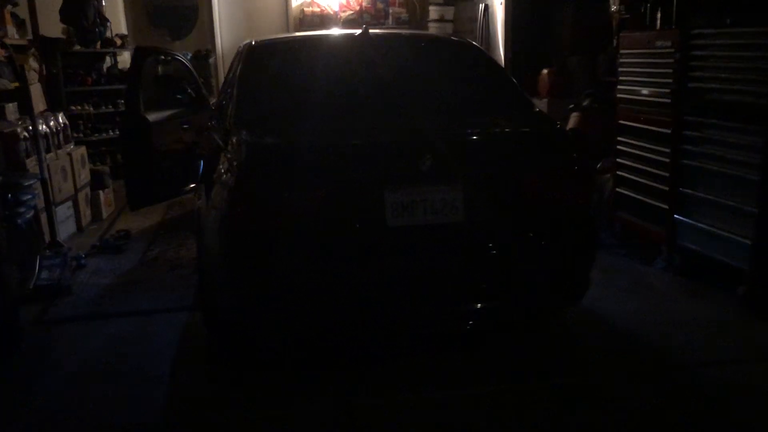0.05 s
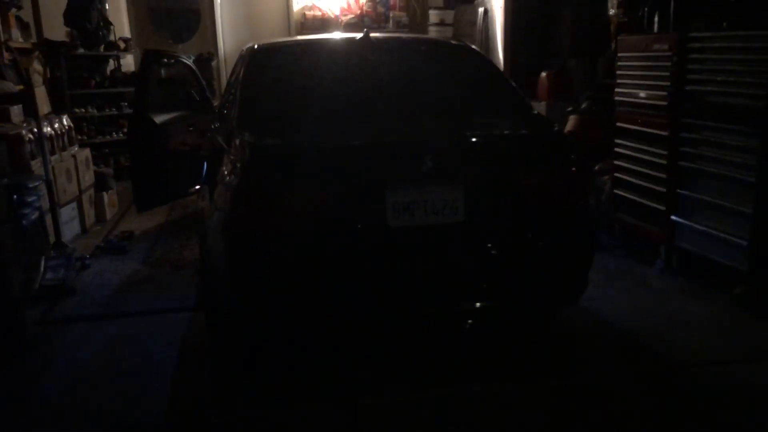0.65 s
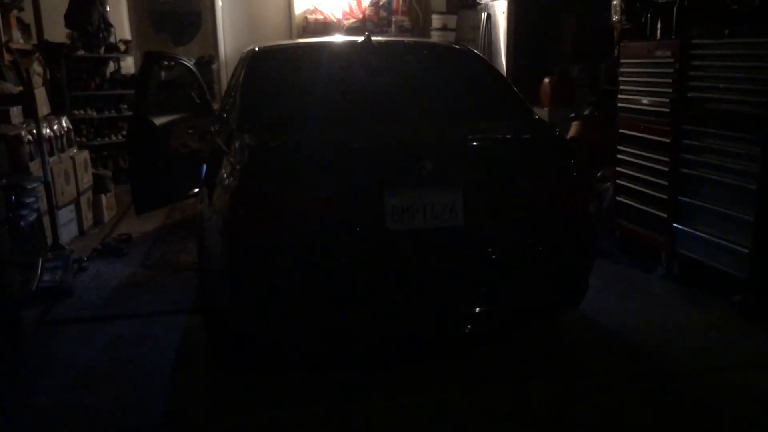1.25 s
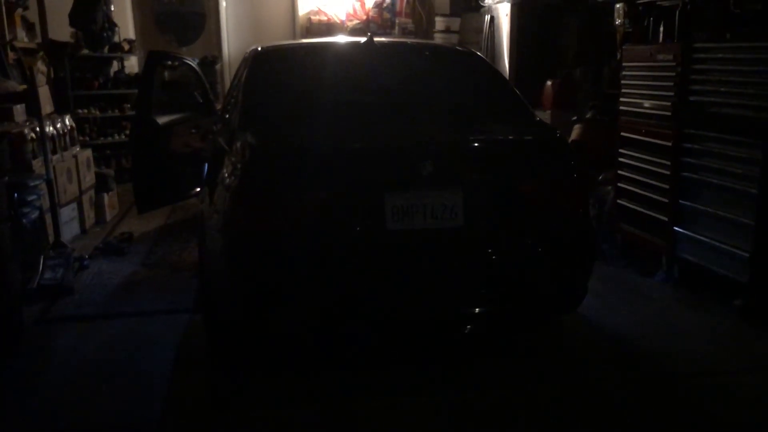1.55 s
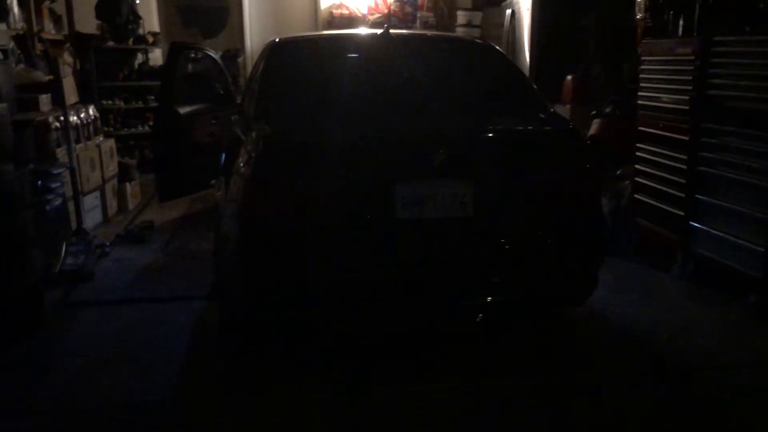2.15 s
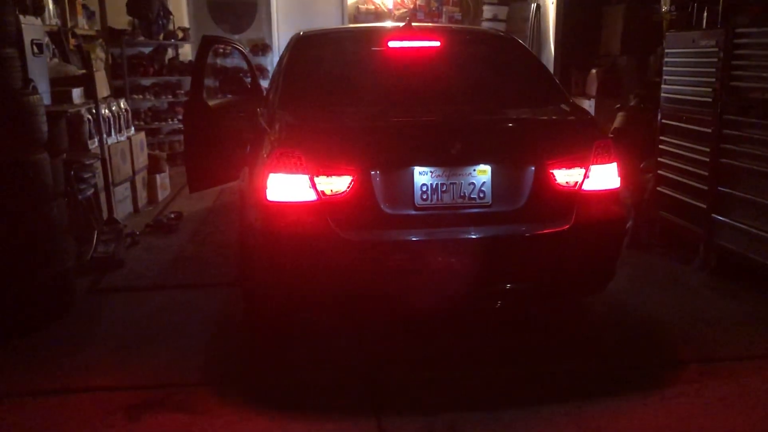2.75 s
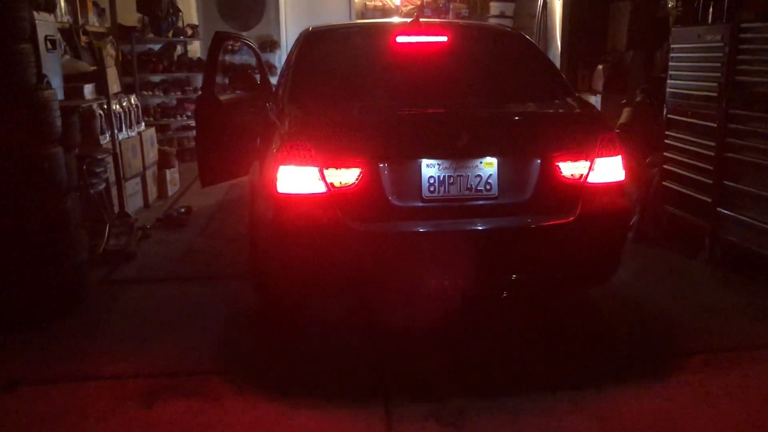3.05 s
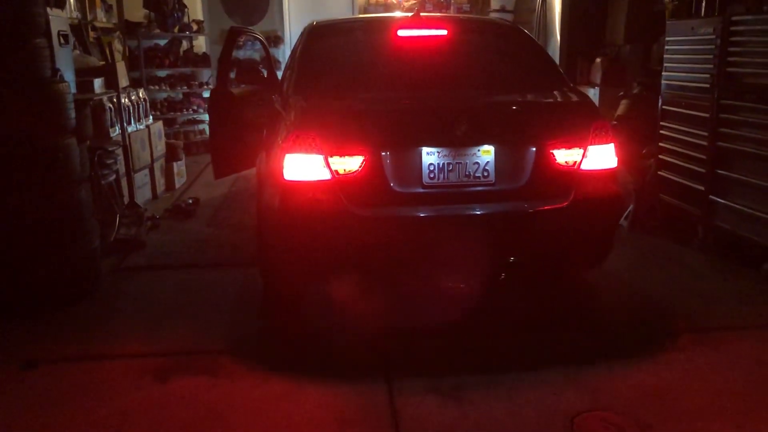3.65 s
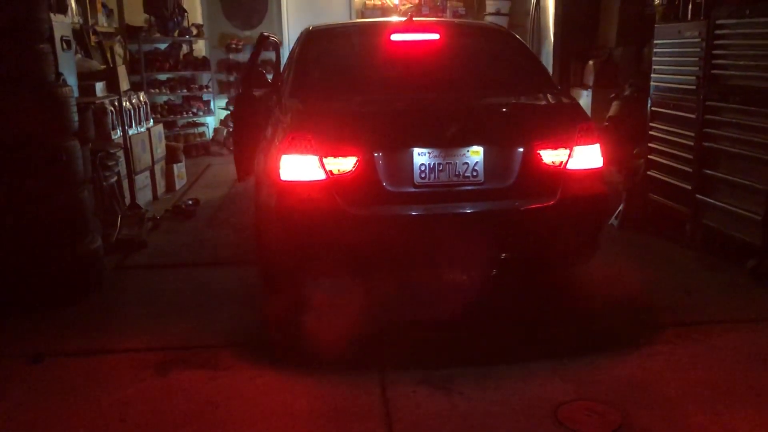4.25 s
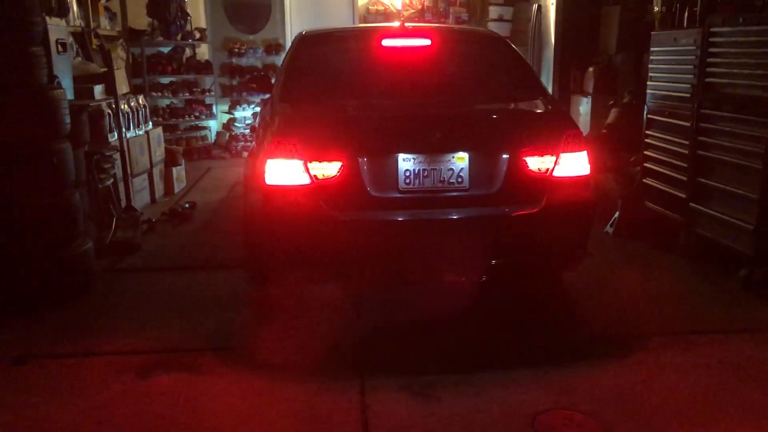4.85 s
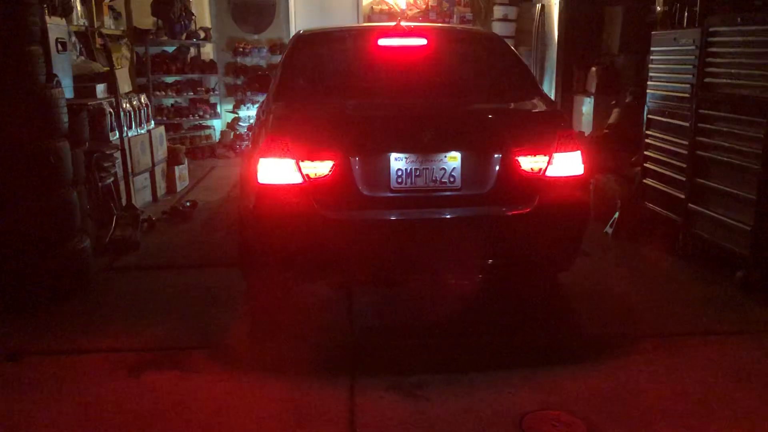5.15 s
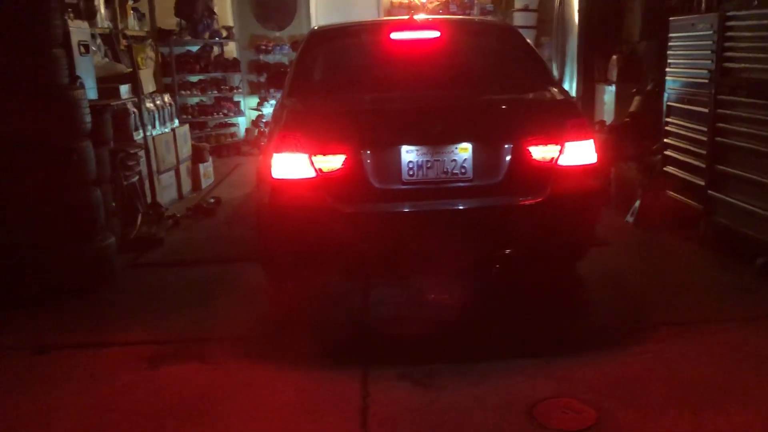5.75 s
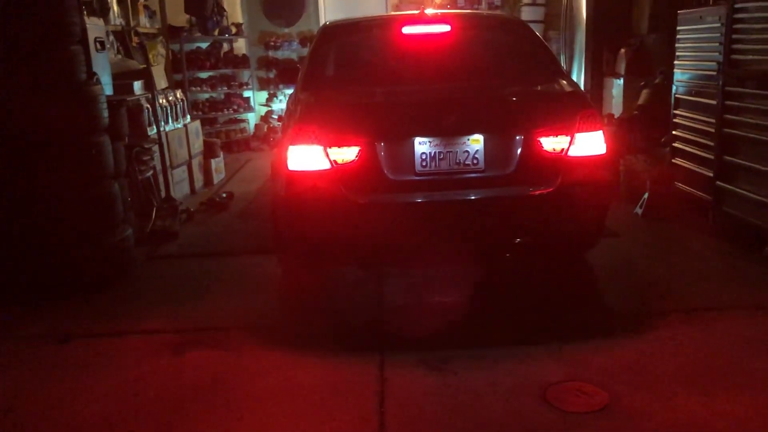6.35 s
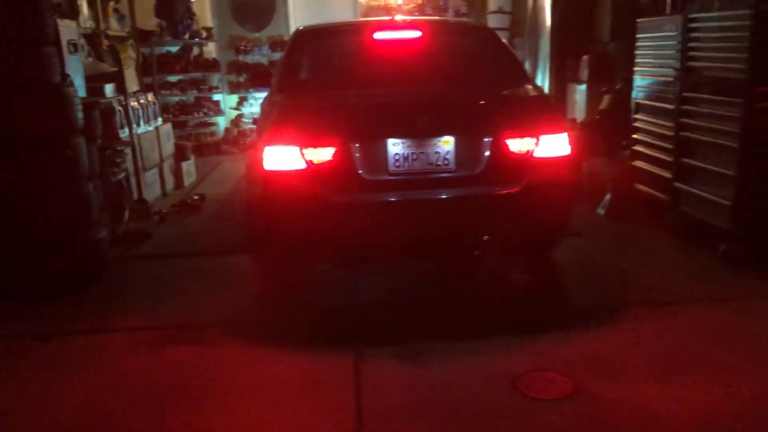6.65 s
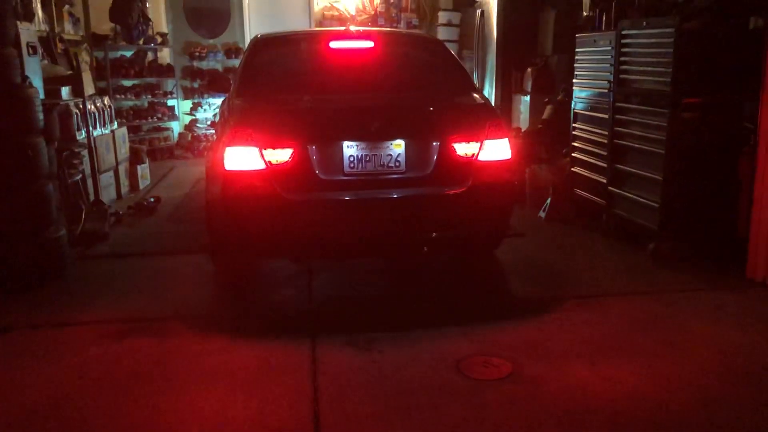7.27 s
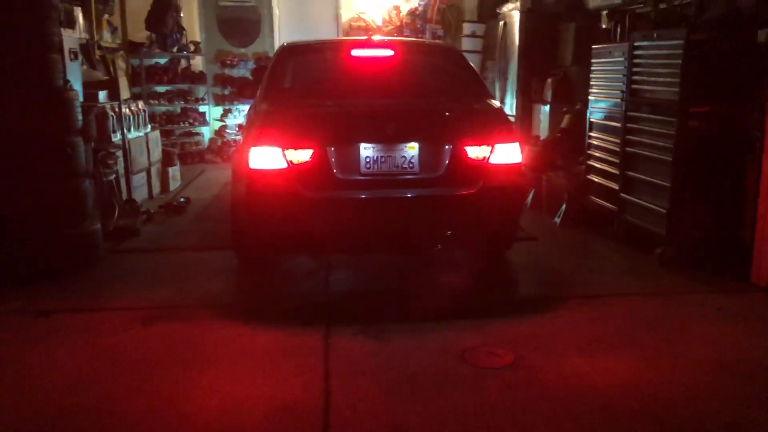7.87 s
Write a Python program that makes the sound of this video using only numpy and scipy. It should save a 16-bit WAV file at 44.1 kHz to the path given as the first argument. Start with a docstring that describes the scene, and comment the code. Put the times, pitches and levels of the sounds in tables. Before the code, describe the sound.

Heard from behind the exhaust, a car starts cold in a garage with a short echo. Two faint motor whirs and a soft jingle of keys come first, over a low room murmur. A brief grinding crank ends in a double bang and a surge of revs. The engine then drops to a loud, throbbing, raspy idle that keeps going, with a barely heard door latch and scattered exhaust pops.

```python
"""A six-cylinder car starts cold in a garage, the microphone behind its tailpipes.
From the cabin a small lock motor whirs and keys jingle; the starter clashes in and cranks, and the
engine catches with two bangs of unburnt fuel and flares up. It sinks to a loud fast idle with a late
spark: the two banks throb unevenly and every firing rasps in the warming pipes. A door shuts.
The cluttered walls add a short tail to the whirs, keys, bangs, rasp and door."""
import sys
import numpy as np
from scipy import signal
from scipy.fft import rfft, irfft
from scipy.io import wavfile
from scipy.ndimage import uniform_filter1d

SR = 44100
rng = np.random.default_rng(int(sys.argv[2]) if len(sys.argv) > 2 else 0)


def to_wav(sig):
    """Store sig (one row per channel, or 1-D mono) as 16-bit WAV at the path in sys.argv[1].

    Samples outside -1..1 are clipped; the rate is SR.
    """
    pcm = np.clip(np.atleast_2d(sig), -1, 1) * 32767
    pcm = np.round(pcm).astype(np.int16)
    wavfile.write(sys.argv[1], SR, pcm.T)  # frames by channels


N = 353241
TIME = np.arange(N) / SR
CUTOFF_HZ = 15850

# spectrum of clattering metal, for starter teeth and door latch: frequency_hz, level_db
CLATTER = [(1470, -11), (2500, -3), (3460, -4.5), (4420, -5), (5620, -8.5), (6070, -9.5), (6760, -11),
           (9500, -18), (15800, -28.5)]
# the six cylinders in firing order, every third one weak: level_db
CYLINDER_DB = [1.8, -2, 1.3, 2.3, -2, -0.4]


def from_db(db):
    """Decibels to gain."""
    return 10 ** (np.asarray(db) / 20)


def rms_one(x):
    """Scale to rms 1."""
    return x / np.sqrt(np.mean(x ** 2) + 1e-20)


def curve(rows):
    """Join (time_s, value) rows with straight lines."""
    return np.interp(TIME, *np.transpose(rows))


def ramp(start_s, length_s):
    """Rise from 0 to 1."""
    return np.clip((TIME - start_s) / max(length_s, 1e-3), 0, 1)


def envelope(start_s, attack_s, hold_s, fall_db_per_s):
    """Attack, hold, release."""
    falling_s = np.clip(TIME - start_s - attack_s - hold_s, 0, 2)
    return ramp(start_s, attack_s) * from_db(-fall_db_per_s * falling_s)


def gain_at(spectrum, hz):
    """Read a spectrum; it falls steeply beyond its ends."""
    points_hz, db = np.transpose(spectrum)
    hz = np.maximum(hz, 1)
    skirts = np.minimum(1, np.minimum(hz / points_hz[0], points_hz[-1] / hz)) ** 4
    return from_db(np.interp(np.log(hz), np.log(points_hz), db)) * skirts


def causal(gain):
    """The response with these gains that rings only after its cause."""
    cepstrum = irfft(np.log(gain + 1e-6))
    half = cepstrum.shape[-1] // 2
    cepstrum[..., 1:half] *= 2
    cepstrum[..., half + 1:] = 0
    return np.exp(rfft(cepstrum))


def noise(spectrum):
    """Coloured noise, rms 1."""
    response = irfft(causal(gain_at(spectrum, np.fft.rfftfreq(8192, 1 / SR))))
    return rms_one(signal.oaconvolve(rng.standard_normal(N), response)[:N])


def drift(rate_hz):
    """A random wander, rms 1."""
    return rms_one(np.interp(TIME * rate_hz, np.arange(4000), rng.standard_normal(4000)))


def clicks(rows):
    """One impulse per (start_s, level_db) row."""
    out = np.zeros(N)
    for start_s, db in rows:
        out[round(start_s * SR)] += from_db(db)
    return out


def ring(x, modes):
    """Drive decaying modes: pitch_hz, level_db, t60_s."""
    out = 0
    for hz, db, t60_s in modes:
        radius, angle = from_db(-60 / (t60_s * SR)), 2 * np.pi * hz / SR
        poles = [1, -2 * radius * np.cos(angle), radius ** 2]
        out = out + from_db(db) * signal.lfilter([0, np.sin(angle)], poles, x + 1e-18)
    return out


def band_rms(x, low_hz, high_hz, window):
    """Running rms in a band."""
    band = signal.sosfiltfilt(signal.butter(3, [low_hz, high_hz], "band", fs=SR, output="sos"), x)
    power = uniform_filter1d(uniform_filter1d(band ** 2, window), window)
    return np.sqrt(np.abs(power) + 1e-12)


def garage(x, wet_db, t60_s=0.41):
    """Direct sound at the microphone and a dense tail from the cluttered walls."""
    t = TIME[:SR // 2]
    tail = rng.standard_normal(len(t)) * from_db(-60 * t / t60_s) * (t > .004)
    return x + from_db(wet_db) * signal.fftconvolve(x, tail / np.sqrt(np.sum(tail ** 2)))[:N]


def room_tone(level_db=-39.5):
    """The low murmur of the garage."""
    # spectrum of the murmur: frequency_hz, level_db
    murmur = [(15, -67), (25, -30.5), (120, -3), (200, -5.5), (307, 0), (361, -12), (392, -5), (557, -11),
              (710, -13), (769, -24.5), (857, -15), (929, -28), (1090, -26), (1470, -42), (15800, -63)]
    return from_db(level_db) * noise(murmur) * ramp(0.031, 0.0034)


def lock_motor(flat_share=0.14, spin_up_s=0.054, waver=0.031, grit=0.98):
    """The steering lock motor whirs twice inside the cabin, spinning up and dying away."""
    # runs of the motor: start_s, hold_s, level_db, full_speed_hz
    runs = [(0.114, 0.026, -56, 467.7), (.425, 0.069, -60, 432)]
    # its harmonics: multiple, level_db
    orders = [(2, 2), (3, -3.5), (4, -14.5), (5, -26), (6, -29)]
    out = 0
    for start_s, hold_s, db, full_speed_hz in runs:
        hz = full_speed_hz * (1 - flat_share * np.exp(-np.maximum(TIME - start_s, 0) / spin_up_s))
        angle = 2 * np.pi * np.cumsum(hz * (1 + waver * drift(160))) / SR
        whir = sum(from_db(order_db) * (1 + grit * drift(200)) * np.sin(multiple * angle)
                   for multiple, order_db in orders)
        out = out + whir * from_db(db) * envelope(start_s, 0.026, hold_s, fall_db_per_s=70)
    return garage(out, wet_db=8.5)


def keys(scrape_s=0.019):
    """The key scrapes in and seats with a knock while its ring swings and jingles."""
    # key and switch clicks: start_s, level_db
    contacts = [(0.9048, -52), (0.954, -38), (1.014, -40.5), (1.065, -42), (1.1823, -44.5), (1.2744, -48.5),
                (1.3828, -50), (1.674, -46), (2.0692, -58), (2.1834, -59), (2.3294, -55)]
    # their spectrum: frequency_hz, level_db
    scrape_colour = [(880, -6), (1500, -2), (1860, -12), (2360, -3), (2820, -9.5), (3820, -5), (4890, -10),
                     (6200, -10.5), (15800, -23)]
    # swings of the key ring: start_s, level_db
    swings = [(.93, -60), (1.01, -69), (1.207, -64), (1.245, -68), (1.3, -60), (1.385, -71)]
    # modes of the key ring: pitch_hz, level_db, t60_s
    ring_modes = [(1240, -2, .4), (2390, -3, 0.17), (9022, -10, 0.24), (10810, -16, 0.36),
                  (12000, -7, 0.17), (13970, -11, .25), (14570, -8, .25)]
    # modes of the key slot: pitch_hz, level_db, t60_s
    slot_modes = [(900, 0, .09), (1270, 0, .06)]
    decays = signal.lfilter([1], [1, -np.exp(-1 / (scrape_s * SR))], clicks(contacts) + 1e-18)
    scrapes = noise(scrape_colour) * decays * from_db(-7.5)
    jingle = ring(clicks(swings), ring_modes)
    knock = ring(clicks([(1.386, -47)]), slot_modes)
    return garage(scrapes + jingle + knock, wet_db=0.5)


def starter(start_s=2.402, attack_s=0.042, hold_s=0.69, compression_hz=9.2, last_compression_s=3.0):
    """The pinion clashes into the flywheel, then grinds on, swelling more with each compression."""
    # spectrum of the gears: frequency_hz, level_db
    gear_colour = [(120, 0), (200, 3.5), (326, -38), (350, -26), (390, 3), (476, -31), (512, 6.5),
                   (849, -9), (929, -7), (1040, -2.5), (2550, -23), (4240, -17), (15000, -50)]
    # modes of the starter housing: pitch_hz, level_db, t60_s
    housing_modes = [(930, 3.5, 0.091), (1150, -5, 0.084), (1312, -2.5, 0.086), (1480, -3, 0.13),
                     (2300, -10.5, 0.27), (4430, -5, 0.03), (6060, -23, .1)]
    # modes of the pinion as it meets the flywheel: pitch_hz, level_db, t60_s
    pinion_modes = [(1350, 2, 0.049), (4500, -5, .03), (5550, -2, .04), (6110, 1, .05), (9600, -12, .07)]
    running = envelope(start_s, attack_s, hold_s, fall_db_per_s=400)
    clash = envelope(start_s, attack_s, hold_s=0.021, fall_db_per_s=208)
    age_s = np.clip(TIME - start_s, 0, hold_s)
    labour_db = 5 * age_s / hold_s * np.cos(2 * np.pi * compression_hz * (TIME - last_compression_s))
    gears = from_db(-46) * noise(gear_colour)
    housing = from_db(-48.5) * rms_one(ring(rng.standard_normal(N), housing_modes))
    grind = running * (gears + housing) * from_db(labour_db + 6 * clash)
    pinion = clash * from_db(-42.5) * rms_one(ring(rng.standard_normal(N), pinion_modes))
    teeth_gain = running * from_db(-58.5 + 16 * age_s + 0.27 * labour_db) + clash * from_db(-44.5)
    teeth = teeth_gain * noise(CLATTER) * from_db(2 * drift(120))
    return grind + teeth + pinion


def backfires(puff_t60_s=0.16):
    """Unburnt fuel bangs ring the tailpipes; dull puffs set the silencer ringing."""
    # lone puffs as the engine catches: start_s, level_db, pitch_hz
    puff_events = [(2.64, -35, 60), (2.997, -15, 89), (3.185, -22, 108), (3.205, -18, 45.3)]
    # bangs in the pipe: start_s, level_db
    bang_events = [(3.0769, -24), (3.1825, -1), (3.1992, -1), (3.3099, -12), (5.2584, -15), (5.3562, -11),
                   (5.4545, -14), (5.7563, -11), (6.1265, -9), (6.6643, -16), (6.9686, -13), (7.3771, -15)]
    # modes of the tailpipe: pitch_hz, level_db, t60_s
    pipe_modes = [(948, 5.5, 0.085), (1205, 14.5, 0.0093), (1360, 8.5, 0.028), (1620, -14, 0.019),
                  (2670, -8.5, 0.0083), (2920, -13, 0.0054), (4040, -35, .007)]
    puffs = sum(ring(clicks([(s, db)]), [(hz, 0, puff_t60_s)]) for s, db, hz in puff_events)
    ring_peak = np.abs(ring(clicks([(0, 0)]), pipe_modes)).max()
    bangs = -from_db(2.5) * ring(clicks(bang_events), pipe_modes) / ring_peak
    return puffs + garage(bangs, wet_db=-10)


def layer_gain(law, retard):
    """Gain of an engine layer from the strength of the pulses and the stage of the start."""
    # strength of the exhaust pulses, -12 at idle: time_s, level_db
    effort = [(3.08, -22.5), (3.12, -15), (3.19, -6.5), (3.26, -10), (3.54, -7), (3.77, -13.5), (4.48, -15),
              (4.69, -12.5), (7.16, -11), (7.95, -11.5)]
    idle_db, db_per_effort_db, catching_db, flare_db, early_spark_db, burble_db = law
    effort_db = curve(effort) + 12
    catching = 1 - ramp(3.15, 0.058)   # the first firings are weak and airy
    flare = np.exp(-((TIME - 3.21) / 0.035) ** 2)   # the spare fuel burns off
    burble = ramp(6.61, 0.39)   # the drone loosens
    return from_db(idle_db + db_per_effort_db * effort_db + catching_db * catching + flare_db * flare
                   + early_spark_db * (1 - retard) + burble_db * burble)


def once_per_cycle(firings, place, width):
    """A bell curve once in six firings; place and width count firings."""
    away = (firings - place + 3) % 6 - 3
    return np.exp(-(away / width) ** 2)


def hard_cylinder(firings, retard, accent_db=3.5):
    """Gain of the one cylinder in six that barks harder with a late spark."""
    return from_db(accent_db * retard * once_per_cycle(firings, place=5.26, width=0.23))


def silencer_rumble(firings, retard, throb_depth=0.37):
    """Turbulence in the silencer throbs with each cylinder's pulse."""
    # spectrum of the turbulence: frequency_hz, level_db
    turbulence = [(20, -23), (50, -10), (100, -18.5), (160, 5.5), (260, 5.5), (320, -3.5), (450, 1),
                  (620, -1), (900, -4.5), (1500, -13.5), (3000, -31.5)]
    # its loudness: idle_db, db_per_effort_db, catching_db, flare_db, early_spark_db, burble_db
    law = (-25, 1.15, -8, 4.5, -3, -0.7)
    pulses = firings - .5 * retard
    cylinder_db = np.interp(pulses, np.arange(6), CYLINDER_DB, period=6)
    throb = (1 + throb_depth * np.cos(2 * np.pi * pulses)) * from_db(0.79 * cylinder_db)
    return noise(turbulence) * throb * hard_cylinder(firings, retard) * layer_gain(law, retard)


def valve_hiss(firings, retard, tick_db=1.64, flicker_db=0.94):
    """Valves hiss in the engine bay, ticking at the firing rate."""
    # spectrum of the hiss: frequency_hz, level_db
    hiss_colour = [(2290, -15), (3900, -3.5), (4410, -3), (5320, -5.5), (12600, -12.5), (15200, -14.5),
                   (15800, -12)]
    # its loudness: idle_db, db_per_effort_db, catching_db, flare_db, early_spark_db, burble_db
    law = (-47.5, 0.56, 7.5, 1, -0.9, 1.0)
    ticking_db = tick_db * np.cos(2 * np.pi * (firings - 0.67)) + flicker_db * drift(90)
    return noise(hiss_colour) * from_db(ticking_db) * layer_gain(law, retard)


def exhaust_tone(firing_hz, firings, retard, warmth, bank_lag_rad=1.62, flutter_db=1.45):
    """Pulses as harmonics of half the firing rate; unequal banks and a late spark feed the odd ones."""
    # pipe response to both banks together: frequency_hz, level_db
    bank_sum = [(60, 17), (120, 0.5), (157, 8), (180, 2.5), (236, -1), (281, -4), (303, -20), (370, -18.5),
                (425, -6.5), (485, -23.5), (540, -7), (615, -13.5), (740, -22.5), (1100, -19)]
    # pipe response to the difference between the banks: frequency_hz, level_db
    bank_difference = [(30, -42), (90, -41), (120, 7), (149, 1), (205, -12.5), (268, -14), (330, -19),
                       (385, -33), (430, -42), (510, -22.5), (570, -6), (690, -54), (1100, -28)]
    # lines from unequal cylinders, at any spark timing: firing_rate_multiple, level_db
    uneven_lines = [(1.5, -23), (3.5, -5.5), (5.5, -24.5)]
    # loudness of the low boom, middle body and upper bark:
    # idle_db, db_per_effort_db, catching_db, flare_db, early_spark_db, burble_db
    boom_law = (-16.5, 1.22, -5.5, -6, -0.6, -.2)
    body_law = (-15, 1.17, -0.2, -0.7, 0.4, 1)
    bark_law = (-23.5, 1.4, -8, 3.3, -2.5, -6.5)
    cycle = (firings + 0.0059 * drift(70)) % 2   # one firing of each bank, with slight jitter
    boom = np.sqrt(2) * np.cos(2 * np.pi * cycle) * layer_gain(boom_law, retard)
    body, bark = np.zeros(N), np.zeros(N)
    step = 64   # samples between gain updates
    for k in range(3, 27):
        hz = k * firing_hz[::step] / 2
        phase = .16 * (k - 2) * (k - 5)   # the pipes disperse each pulse
        bark_share = np.clip((hz - 310) / 60, 0, 1)
        lift = 1 + 0.066 * bark_share * (1 - retard[::step])   # the growl sits higher while it revs
        gain = gain_at(bank_difference if k % 2 else bank_sum, hz / (warmth[::step] * lift))
        if k % 2:   # the banks differ mostly in when their pulses arrive
            uneven = sum(from_db(db) for multiple, db in uneven_lines if round(2 * multiple) == k)
            gain = np.hypot(gain * (0.17 + retard[::step]), uneven)
            phase -= bank_lag_rad
        line = np.cos(np.pi * k * cycle + phase)
        body += line * np.repeat(gain * (1 - bark_share), step)[:N]
        bark += line * np.repeat(gain * bark_share, step)[:N]
    body *= layer_gain(body_law, retard) / band_rms(body, 105, 310, window=3000)
    bark *= hard_cylinder(firings, retard)
    bark *= layer_gain(bark_law, retard) / band_rms(bark, 390, 800, window=3000)
    return boom + body + bark * from_db(flutter_db * drift(60))


def rasp(firings, retard, warmth, late_firings=.26, burst_s=0.00072, spread_db=1.86, treble_db=1.5):
    """Each firing lets out a burst of gas, coloured by resonances that rise as the pipes warm."""
    # spectrum of one burst: frequency_hz, level_db
    gas_colour = [(200, -28), (350, -1), (600, 6), (850, 1.5), (1020, -1.5), (1200, 4), (1550, -1.5),
                  (1800, -1), (2130, -15.5), (2500, -9.5), (3050, -7), (3550, -23), (4300, -34),
                  (6000, -35.5)]
    # loudness of the rasp: idle_db, db_per_effort_db, catching_db, flare_db, early_spark_db, burble_db
    law = (-31, 1.0, 4.5, 6.5, -8.5, -1.9)
    delayed = firings - late_firings * retard * (firings > 1)
    starts = np.flatnonzero(np.diff(np.ceil(delayed)) > 0)
    size = 1024
    t, hz = TIME[:size], np.fft.rfftfreq(size, 1 / SR)
    draws = rng.standard_normal((400, size + 2))[:len(starts)]
    tilt, force, gas = draws[:, :1], draws[:, 1], draws[:, 2:]
    bursts = gas * t / burst_s * np.exp(1 - t / burst_s)
    brightness = from_db(treble_db * tilt * np.tanh((hz - 2200) / 600))
    pipe = causal(brightness * gain_at(gas_colour, hz / warmth[starts, None]))
    bursts = irfft(rfft(bursts) * pipe)
    strength = from_db(spread_db * force + np.resize(CYLINDER_DB, len(starts))) / bursts.std(axis=1)
    out = np.zeros(N + size)
    for start, burst in zip(starts, bursts * strength[:, None]):
        out[start:start + size] += burst
    out = garage(out[:N], wet_db=-7)
    running_rms = np.maximum(band_rms(out, 1000, 3600, window=5000), .1)
    return out / running_rms * layer_gain(law, retard)


def thump(firings, retard, low_cut_hz=230):
    """Once per engine cycle the late spark pushes one extra, blunt pulse out of the pipe."""
    pulses = -from_db(-10.5) * retard * once_per_cycle(firings, place=5.54, width=0.052)
    return signal.sosfilt(signal.butter(2, low_cut_hz, "high", fs=SR, output="sos"), pulses + 1e-18)


def engine(retard_from_s=3.7, retard_lag_s=.72):
    """All layers follow the crank; after the flare-up the spark slides late to warm the pipes."""
    # engine speed, three firings per turn of the crank: time_s, firing_hz
    speed = [(3.077, 31.88), (3.17, 57.81), (3.27, 76.33), (3.55, 79.23), (3.85, 73.0), (4.4, 64.32),
             (5.0, 59.89), (5.25, 61.34), (5.6, 59.86), (5.9, 59.47), (6.4, 59.57), (7.1, 58.81),
             (8.0, 58.21)]
    # hot gas raises the pipe resonances: time_s, frequency_factor
    warming = [(3.1, .93), (3.7, 1.05), (4.3, 0.96), (5.0, 0.94), (6.7, 1.027), (8.0, 1.144)]
    firing_hz, warmth = curve(speed), curve(warming)
    first_firing_s = speed[0][0]
    firings = np.cumsum(firing_hz * (TIME >= first_firing_s)) / SR
    retard = 1 - np.exp(-np.maximum(TIME - retard_from_s, 0) / retard_lag_s)   # 0 early, 1 late
    rush = silencer_rumble(firings, retard) + valve_hiss(firings, retard)
    pulses = exhaust_tone(firing_hz, firings, retard, warmth) + thump(firings, retard)
    return ramp(first_firing_s, 0.0078) * (rush + pulses) + rasp(firings, retard, warmth)


def ticks(low_hz=11000):
    """Two thin, bright ticks over the running engine."""
    # light ticks: start_s, level_db
    events = [(3.828, -55), (4.825, -46)]
    strength = sum(from_db(db) * envelope(s, .002, hold_s=0, fall_db_per_s=200) for s, db in events)
    return strength * noise([(low_hz, 0), (CUTOFF_HZ, 0)])


def door(start_s=4.592):
    """The driver's door shuts: its latch and trim rattle briefly."""
    rattle = noise(CLATTER) * from_db(-40 + 2.3 * drift(150))
    return garage(rattle * envelope(start_s, 0.016, hold_s=0.03, fall_db_per_s=200), wet_db=-7)


def scene():
    """The cold start over the room tone, in mono from behind the car."""
    return (room_tone() + lock_motor() + keys() + starter() + engine() + backfires()
            + door() + ticks())[None]


def record(dry):
    """The highest peaks are rounded and the top treble is cut."""
    limited = dry / (1 + np.abs(dry) ** 8) ** (1 / 8)
    return signal.sosfilt(signal.ellip(10, .2, 80, CUTOFF_HZ, fs=SR, output="sos"), limited)


dry = scene()
out = record(dry)
to_wav(out)
```